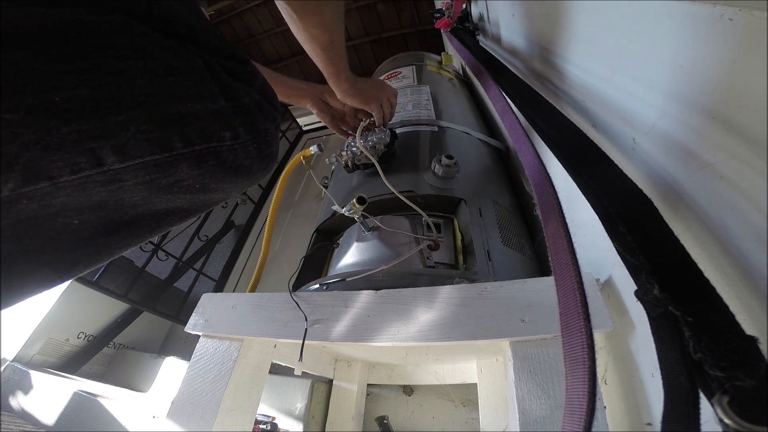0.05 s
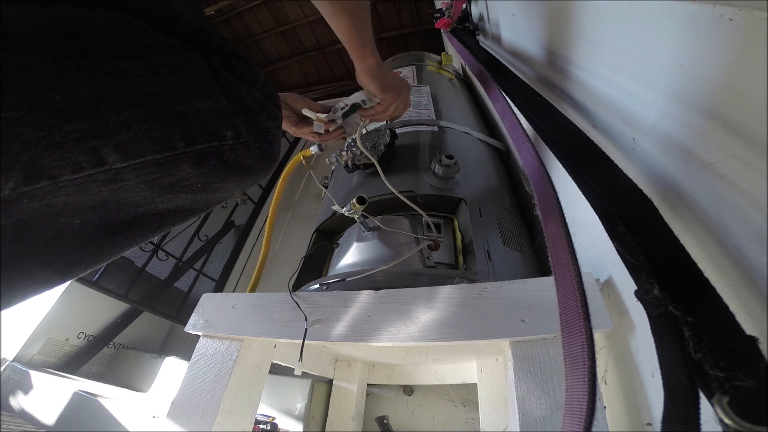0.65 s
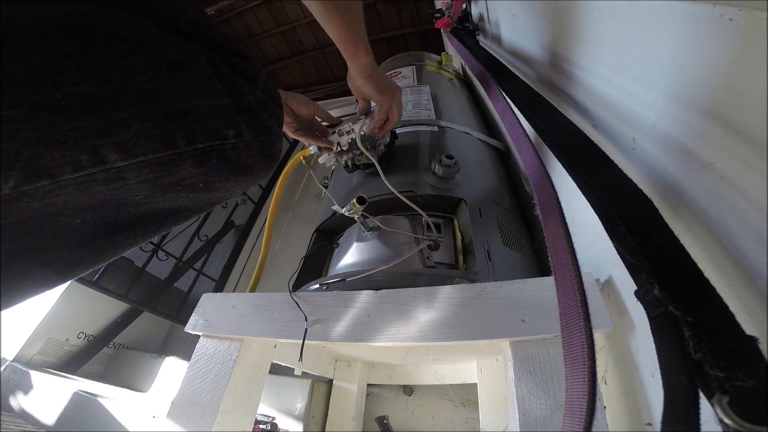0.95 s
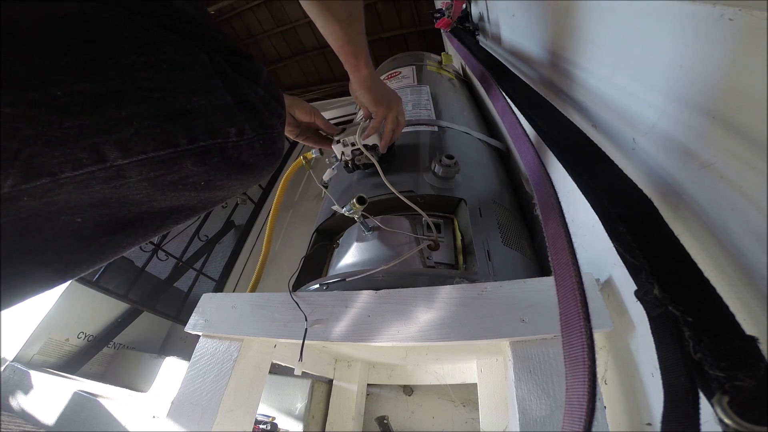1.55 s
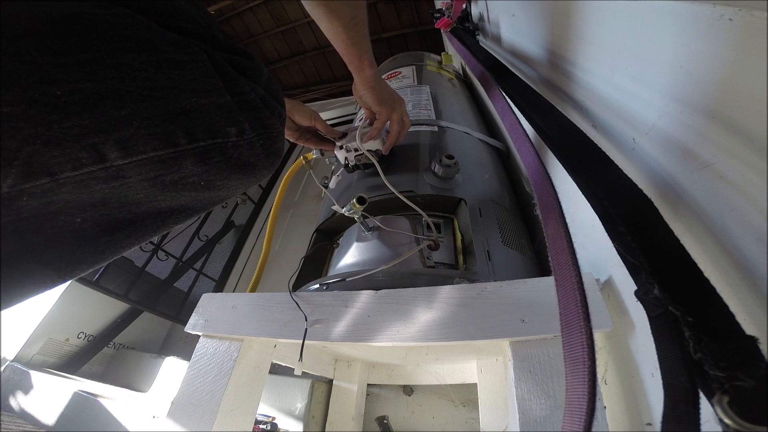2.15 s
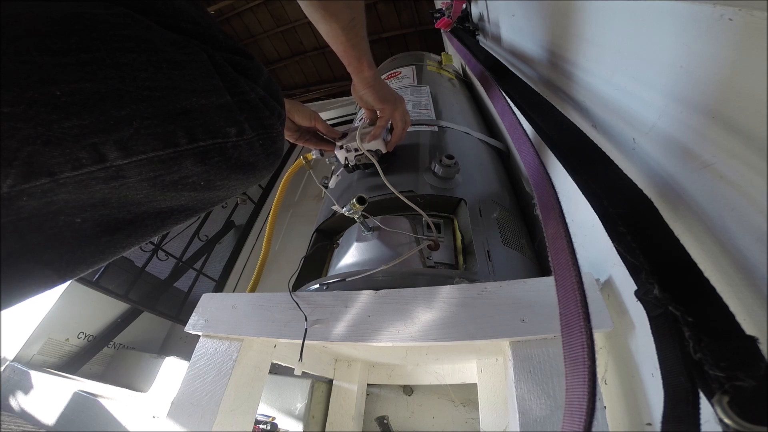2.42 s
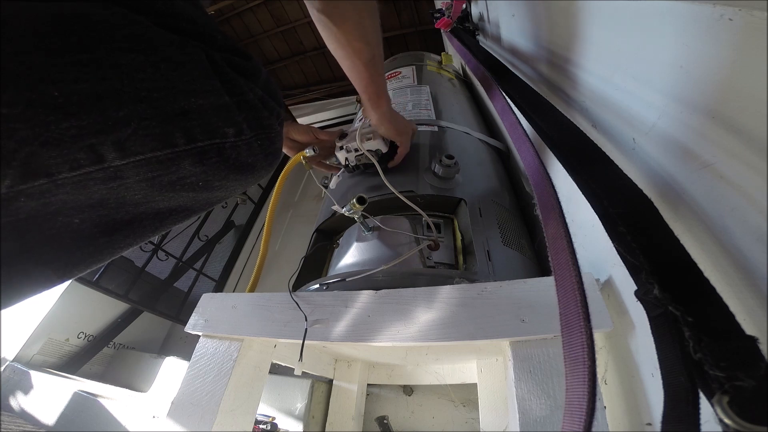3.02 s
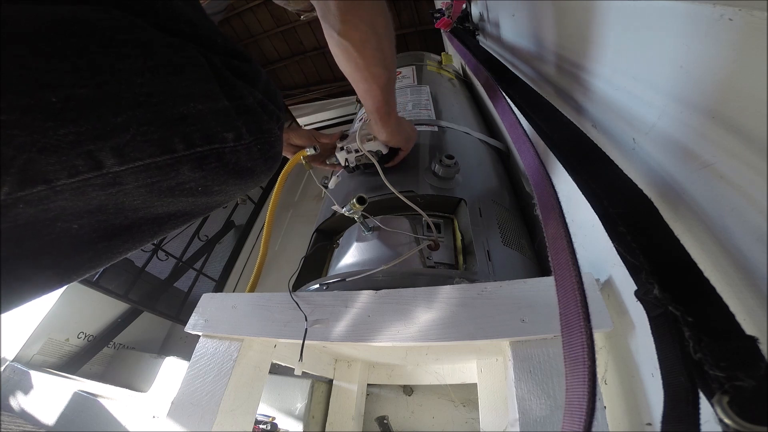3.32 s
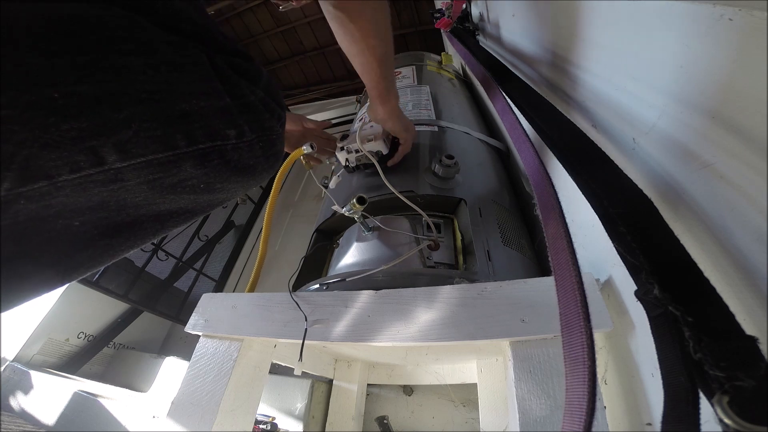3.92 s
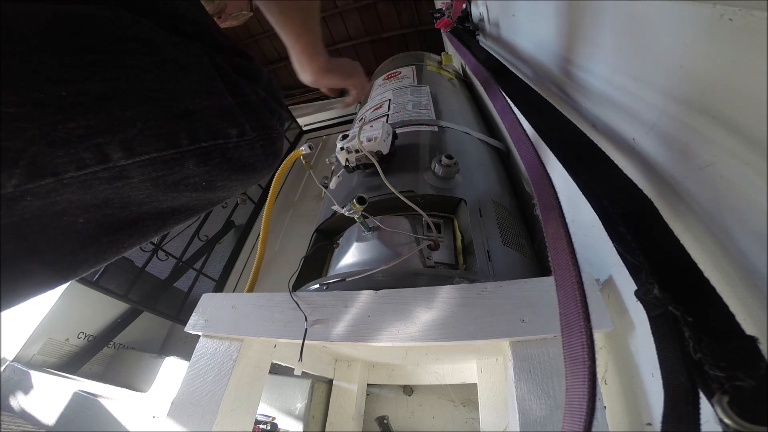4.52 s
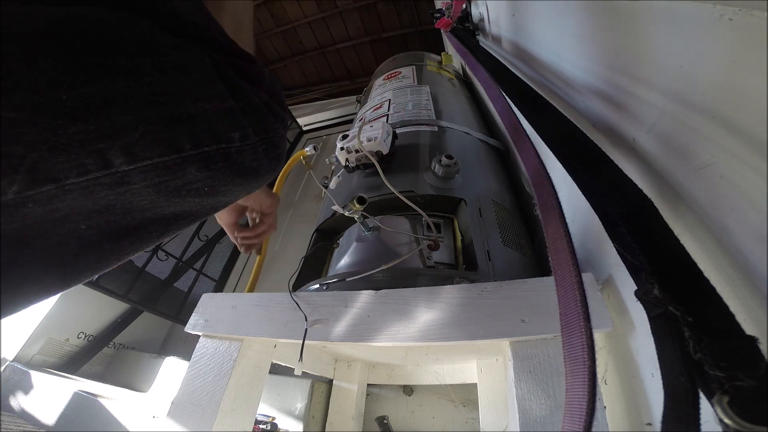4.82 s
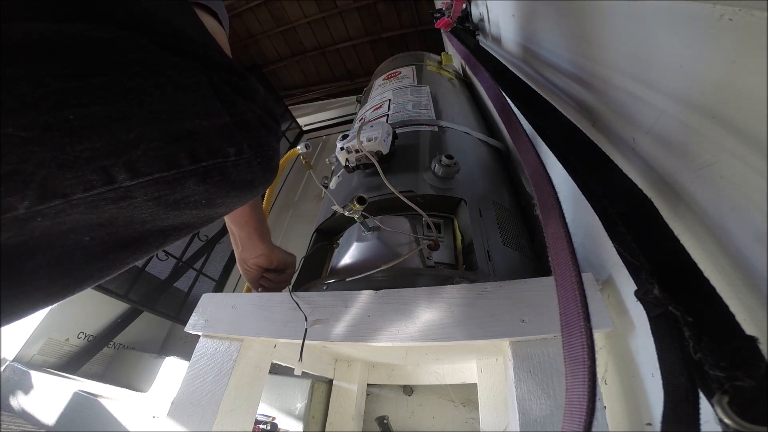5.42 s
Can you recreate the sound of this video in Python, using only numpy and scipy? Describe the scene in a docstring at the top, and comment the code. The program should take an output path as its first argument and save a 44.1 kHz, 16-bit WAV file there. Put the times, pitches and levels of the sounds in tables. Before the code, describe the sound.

Hands work on the wires of a water heater's gas valve in a narrow closet, making soft rustles, fingernail scratches and light ticks. Past the middle, the plastic cover snaps home loudly with a brief hollow ring from the steel tank, and a smaller snap follows. Near the end come a low scuff, a short scrape and a tap. The handling sounds close, over a faint, distant idling engine.

```python
"""The plastic cover of a water heater's gas valve snaps home as hands work on it in a narrow closet.
Each impact excites the valve's damped modes, drives the steel tank and reverberates between the walls.
Wires rustle and tick by friction, nails scratch by stick-slip, and at the end weight shifts and a hand
scrapes. A far engine idles at its firing frequency while other motors drone in and out.
Gain control ducks the background after the loudest snap."""
import sys
import numpy as np
from scipy import signal
from scipy.fft import rfft, irfft
from scipy.io import wavfile
from scipy.ndimage import uniform_filter1d, minimum_filter1d

SR = 44100
rng = np.random.default_rng(int(sys.argv[2]) if len(sys.argv) > 2 else 0)


def dump_mix(stems):
    """Bounce the given channels to the path in sys.argv[1] as a 16-bit WAV at rate SR."""
    frames = np.atleast_2d(stems).T  # one column per channel
    limited = np.clip(frames, -1, 1)  # hard clip at full scale
    pcm = np.round(limited * 32767).astype(np.int16)
    wavfile.write(sys.argv[1], SR, pcm)


N = 249606


def from_db(db):
    """Amplitude ratio of a level in decibels."""
    return 10 ** (np.asarray(db) / 20)


def rms_one(x):
    """Normalisation to unit rms."""
    return x / np.sqrt(np.mean(x ** 2) + 1e-20)


def at_hz(points, hz):
    """Interpolation on a logarithmic frequency axis."""
    return np.interp(np.log(hz + 1), np.log(np.array(points)[:, 0]), np.array(points)[:, 1])


def noise(spectrum, size=N):
    """Spectral shaping of white noise, at unit rms."""
    hz = np.arange(size // 2 + 1) * SR / size
    shaped = rfft(rng.standard_normal(size)) * from_db(at_hz(spectrum, hz)) * (hz > 10)
    return rms_one(irfft(shaped, size))


def drift(corner_hz):
    """Random modulation: low-passed noise at unit rms."""
    hz = np.arange(N // 2 + 1) * SR / N
    return rms_one(irfft(rfft(rng.standard_normal(N)) / (1 + (hz / corner_hz) ** 2), N))


def band(x, low, high):
    """Causal band-pass filtering."""
    return signal.sosfilt(signal.butter(2, [low, high], "band", fs=SR, output="sos"), x)


def ringing(modes, t):
    """Modal superposition: damped sinusoids of alternating sign."""
    hz, db, t60 = np.array(modes).T[:, :, None]
    strength = from_db(db) * (-1) ** np.arange(len(hz))[:, None]
    return np.sum(strength * from_db(-60 * t / t60) * np.sin(2 * np.pi * hz * t), axis=0)


def add(track, start, sound):
    """Superposition of a sound on a track from a start time in seconds."""
    at = int(start * SR)
    track[at:at + len(sound)] += sound[:N - at]


def stroke(start, length, rise_share=0.36):
    """Envelope of one movement: a quarter sine from rest up to 1, and another back."""
    turn = start + length * rise_share
    return np.sin(np.pi / 2 * np.interp(np.arange(N) / SR, [start, turn, start + length], [0, 1, 0]))


# spectrum of the engine's rumble: (frequency [Hz], relative level [dB])
RUMBLE = [(18, -12), (27, 1.5), (37, -3), (60, -1), (85, -3.5), (115, -3), (170, -9), (240, -7),
          (340, -15.5), (450, -16.5), (650, -23.5), (1200, -30), (4000, -56.5)]

def engine(firing_hz=73.4, firing_db=-48, octave_db=-7, rumble_db=-47, swell_s=1.6, swell_db=9.5):
    """Transmission through walls leaves an uneven firing tone, its octave and a low rumble."""
    tone_db = firing_db - swell_db * np.maximum(1 - np.arange(N) / SR / swell_s, 0)
    phase = 2 * np.pi * np.cumsum(firing_hz * (1 + .011 * drift(7))) / SR
    throb_db, octave_throb_db = 3.0 * drift(10), 2.5 * drift(9)
    firing = np.sin(phase) * from_db(throb_db) + np.sin(2 * phase) * from_db(octave_db + octave_throb_db)
    return from_db(tone_db) * rms_one(firing) + from_db(rumble_db) * noise(RUMBLE)


# spectrum of the still air: (frequency [Hz], relative level [dB])
AIR = [(290, -38), (500, -10.5), (871, -6), (1030, -3.5), (2230, -11), (8370, -28), (11400, -33.5),
       (12600, -39), (15000, -34)]

def air(level_db=-61.5):
    """Stationary broadband noise forms the ambient floor."""
    return from_db(level_db) * noise(AIR)


# far motors: (start [s], duration [s], first frequency [Hz], last frequency [Hz], level [dB])
DRONES = [(-.4, 0.96, 111.2, 111.9, -51.5), (2.746, 0.72, 129, 116.6, -53), (3.351, 1.1, 114.7, 109.7, -49),
          (3.998, 1.13, 267, 262.6, -59.5)]

def motor_drones(waver_db=2.5):
    """Amplitude and frequency modulation: each motor's tone swells, glides a little and fades."""
    t, out = np.arange(N) / SR, 0
    for start, length, first_hz, last_hz, level_db in DRONES:
        hz = np.interp(t, [start, start + length], [first_hz, last_hz])
        tone = rms_one(np.sin(2 * np.pi * np.cumsum(hz) / SR))
        out = out + from_db(level_db) * stroke(start, length) * tone
    return out * from_db(waver_db * drift(8))


# friction spectra, middle register and treble: (frequency [Hz], relative level [dB])
RUB_MID = [(300, -20), (1000, -3), (1500, -1), (2000, 0), (2300, 0.5), (2600, -3), (3100, -6), (3700, -2.5),
           (4800, -12.5), (7000, -23), (15000, -53)]
RUB_TREBLE = [(300, -46), (2500, -19), (4500, -0.5), (6500, 3), (8500, -8), (11000, -3.5), (15000, -14)]
# resonances of the slack wires: (frequency [Hz], bandwidth [Hz], gain [dB])
WIRES = [(1610, 180, 1), (2320, 200, 5.5), (3650, 330, -6)]
# hands and sleeves over the wires: (start [s], duration [s], level [dB], relative treble level [dB])
STROKES = [(0, 0.022, -61, -2), (0.244, 0.22, -60, -6), (0.425, 0.21, -60.5, -7), (0.58, 0.31, -60.5, -8.5),
           (0.743, 0.075, -64, -4), (0.795, 0.24, -65, -10), (0.972, 0.16, -58.5, -8.5),
           (1.171, 0.2, -58.5, -10.5), (1.374, 0.12, -60, -15), (1.538, 0.2, -62.5, -10),
           (1.854, 0.33, -59.5, -11.5), (2.71, 0.085, -63.5, -11), (2.843, 0.092, -54, -16),
           (2.933, 0.2, -64.5, -8), (3.12, .09, -59.5, -7), (3.202, 0.12, -61.5, -13),
           (3.98, 0.51, -66.5, -4.5), (4.435, 0.16, -63.5, -1), (4.561, 0.35, -74, 0),
           (5.173, 0.069, -60, -21), (5.3, 0.069, -52.5, -9.5)]

def rubbing(grain_db=2.0, grain_hz=160, catches_per_s=260, buzz_db=-5.0, wander_db=3):
    """Sliding friction: skin and sleeves slip and catch, and under a stroke the wires resonate."""
    restless_mid_db, restless_treble_db = -67.5, -77   # the hands never rest entirely
    mid_power, treble_power = 0, from_db(restless_treble_db) ** 2
    for start, length, level_db, treble_db in STROKES:
        power = (from_db(level_db) * stroke(start, length)) ** 2
        mid_power = mid_power + power
        treble_power = treble_power + power * from_db(treble_db) ** 2
    slips = rms_one(from_db(grain_db * drift(grain_hz)))
    catches = rms_one((rng.random(N) < catches_per_s / SR) * rng.uniform(-1.05, 1, N))
    friction = slips * rng.standard_normal(N) * from_db(-3) + catches
    buzz = sum(from_db(db + wander_db * drift(6.1)) * band(friction, hz - width / 2, hz + width / 2)
               for hz, width, db in WIRES)
    mid = rms_one(slips * noise(RUB_MID) + from_db(buzz_db) * rms_one(buzz))
    restless = from_db(restless_mid_db) * slips * noise(RUB_MID)
    return np.sqrt(mid_power) * mid + restless + np.sqrt(treble_power) * slips * noise(RUB_TREBLE)


def wire_ticks(peak_ticks_per_s=55, tick_db=7, ring_cycles=30):
    """A Poisson process: wires collide at a rate proportional to stroke speed, each at a random pitch."""
    speed = sum(stroke(start, length) for start, length, _, _ in STROKES)
    force = sum(from_db(level_db) * stroke(start, length) for start, length, level_db, _ in STROKES)
    sizes = from_db(tick_db + np.minimum(rng.exponential(1, N), 2))
    flicks = (rng.random(N) < peak_ticks_per_s * speed / SR) * sizes * force
    pitches_hz = np.geomspace(2200, 5400, 10)
    pitch_index = rng.integers(0, len(pitches_hz), N)
    t = np.arange(SR // 50) / SR
    return sum(signal.fftconvolve(flicks * (pitch_index == k), ringing([(hz, 0, ring_cycles / hz)], t))
               for k, hz in enumerate(pitches_hz))[:N]


# spectrum of a contact's crack: (frequency [Hz], relative level [dB])
CRACK = [(150, 1), (600, 0), (1000, -0.5), (2000, 4.5), (3800, 2), (5000, -8), (7000, -8.5), (9000, -15),
         (15000, -14.5)]
# modes of the valve housing and cover: (frequency [Hz], level [dB], decay time T60 [s])
VALVE = [(575, -15.5, 0.037), (744, -7, .03), (1003, -15, .045), (1130, -11.5, .033), (1687, -1.5, .02),
         (1835, -0.5, 0.016), (2170, -3.5, 0.017), (2420, -4.5, .018), (2645, -12.5, .015),
         (3067, -5, 0.027), (3385, -4.5, .028), (3680, -4, .025), (3890, -5, .02), (4130, -9, .02),
         (4470, -11.5, .016), (4850, -13, .016), (5710, -16, 0.012), (6100, -19.5, 0.024),
         (6940, -15, .012), (10620, -23, .012)]

def contact(levels_db, contact_s, spot, valve_db, damping_db_per_s=0, rise_s=0.00096, scatter_db=-12.0):
    """Impact excitation: a crack, its scatter off nearby parts and the modes of valve and struck spot."""
    t = np.arange(SR // 8) / SR
    scatter = from_db(scatter_db - 60 * t / 0.097)
    crack = from_db(0.5) * noise(CRACK, size=len(t)) * (np.exp(-t / contact_s) + scatter)
    modes = from_db(valve_db) * ringing(VALVE, t) + ringing(spot, t)
    hit = (modes + crack) * (1 - np.exp(-t / rise_s)) * from_db(-damping_db_per_s * t)
    # neighbouring bands take opposite signs so that they join without a gap
    thud, body = -band(hit, 130, 1100), band(hit, 1300, 4700)
    edge, sparkle = -band(hit, 4500, 8000), band(hit, 9000, 14000)
    # each band's level is its rms over the first 10 ms
    return sum(from_db(db) * part / np.sqrt(np.mean(part[:SR // 100] ** 2))
               for db, part in zip(levels_db, (body, thud, edge, sparkle)))


# blows on the valve: (time [s], body level [dB], thud level [dB], edge level [dB], sparkle level [dB],
# contact time [s], hollow mode [Hz], bright mode [Hz], valve mode gain [dB], finger damping [dB/s])
SNAPS = [(0.0350, -39.5, -43, -38, -50.5, 0.0031, 1090, 2210, -12, 102),
         (0.0410, -36.5, -46, -60, -66, 0.002, 296, 2290, -16, 92),
         (3.4830, -39, -42, -50, -51, .001, 560, 2500, -8, 3000),
         (3.4854, -24.5, -23.5, -36, -42, .0015, 600, 3850, -8, 1800),
         (3.5042, -5, -15.5, -20.5, -30.5, 0.0019, 598.6, 1760, -1, 240),
         (3.5104, -23, -23, -34, -48, 0.0045, 399, 3100, -9, 20),
         (3.5165, -26.5, -25, -42, -53.5, .004, 301, 1500, -11, 20.5),
         (3.963, -35, -46, -58, -60, 0.0015, 474, 1600, -4, 600),
         (3.966, -21.5, -35.5, -32.5, -41, 0.0011, 580, 3085, 1.5, 400.5),
         (3.9722, -33.5, -44.5, -46, -61, .003, 560, 3250, -10.5, 201),
         (3.9835, -46, -53, -56, -66, .004, 397, 3700, -12, 200)]

def cover_snaps():
    """Damped free vibration: the stiff plastic cover catches, snaps home and rings only briefly."""
    out = np.zeros(N)
    for start, *levels_db, contact_s, hollow_hz, bright_hz, valve_db, damping in SNAPS:
        spot = [(hollow_hz, 0, .022), (bright_hz, 1.5, .016)]
        add(out, start, contact(levels_db, contact_s, spot, valve_db, damping))
    return out


# modes of the sheet steel tank jacket: (frequency [Hz], level [dB], decay time T60 [s])
TANK = [(151.7, 0, 0.28), (200, -2, .2), (248.6, 5, .3), (270, -3, .33), (361, 1, 0.36), (402.4, 5, 0.33),
        (602.6, -21, 0.19), (710, -18.5, .3), (766, -17.5, .22), (955, -10.5, .16), (1206, -19.5, .27)]

def tank(blows, coupling_db=-52):
    """Structure-borne sound: blows on the valve drive the modes of the steel jacket."""
    t = np.arange(SR // 2) / SR
    return from_db(coupling_db) * signal.fftconvolve(blows, ringing(TANK, t))[:N]


# spectrum of the closet's reverberation: (frequency [Hz], relative level [dB])
ECHO = [(100, 1), (260, 14), (420, 12), (600, 0), (1000, 2.5), (1400, 3.5), (1900, -6.5), (2400, -6.5),
        (3500, -4), (4700, -2), (7000, -4.5), (15000, -7)]
# its decay: (frequency [Hz], reverberation time T60 [s])
ECHO_T60 = [(100, 0.99), (400, 0.29), (1500, 0.34), (4000, 0.26), (8000, 0.26), (15000, 0.2)]

def closet(blows, wet_db=-11.5, build_up_s=0.0037):
    """Reverberation: close walls return dense reflections whose treble decays first."""
    t, echo = np.arange(SR // 2) / SR, 0
    edges_hz = np.geomspace(80, 18000, 12)
    for low, high in zip(edges_hz, edges_hz[1:]):
        hz = np.sqrt(low * high)
        decay = from_db(at_hz(ECHO, hz) - 60 * t / at_hz(ECHO_T60, hz))
        echo = echo + band(rng.standard_normal(len(t)), low, high) * decay
    echo = echo * (1 - np.exp(-t / build_up_s))
    return from_db(wet_db) * signal.fftconvolve(blows, echo / np.linalg.norm(echo))[:N]


# fingernails and wire ends drawn over the cover: (start [s], duration [s], level [dB])
SCRATCHES = [(.275, .12, -56.5), (.45, .13, -58), (1.184, 0.14, -58.5), (1.395, 0.11, -62), (1.57, .1, -60),
             (4.452, .115, -62.5)]
# modes that a scratch excites: (frequency [Hz], level [dB], decay time T60 [s])
SCRATCH_MODES = [(1600, -3, .012), (2250, 1, 0.022), (2430, -2, .015), (3680, -2, .022), (4050, -6, .014),
                 (4750, -8, .012), (5550, -9, .012), (7050, -15, .012)]

def scratches(slips_per_s=190, unevenness=0.45, size_spread_db=5.1):
    """Stick-slip motion: every slip of a hard edge excites each mode with a random strength."""
    rate = slips_per_s * np.exp(unevenness * drift(90))
    onsets = np.diff(np.floor(np.cumsum(rate) / SR), prepend=0)
    slips = onsets * from_db(size_spread_db * rng.uniform(-1, 1, N))
    t = np.arange(SR // 20) / SR
    rings = sum(signal.fftconvolve(slips * rng.standard_normal(N), ringing([mode], t))[:N]
                for mode in SCRATCH_MODES)
    return rms_one(rings) * sum(from_db(db) * stroke(start, length) for start, length, db in SCRATCHES)


# modes of the wire terminals: (frequency [Hz], level [dB], decay time T60 [s])
TERMINALS = [(1475, -11, 0.027), (3690, -19, 0.018)]
# light touches of wires and tools, before the band offsets below: (time [s], peak level [dB],
# thud level [dB], edge level [dB], bright mode [Hz], its decay time T60 [s], contact time [s])
TOUCHES = [(.291, -48, -72, -69, 3600, .015, .002), (.315, -43, -68, -61, 3300, 0.018, .005),
           (0.3328, -35, -71, -55, 2480, 0.024, .0043), (.3656, -30.5, -78, -54, 2230, .03, 0.011),
           (0.3766, -37, -70, -62, 3540, .02, .0031), (0.4528, -39, -71, -60, 1740, 0.034, 0.01),
           (.433, -46, -72, -65, 4600, .012, .001), (.533, -43, -68, -66, 1750, .018, .002),
           (0.5746, -43, -68, -61.5, 2360, 0.017, .0028), (.623, -42.5, -71, -80, 2250, 0.068, .001),
           (.8805, -31.5, -56, -71, 2300, 0.022, 0.0027), (.928, -49, -68, -72, 2600, .015, .002),
           (1.2226, -42.5, -64, -62, 2460, .03, .0026), (1.3168, -35, -64, -55.5, 3440, 0.014, 0.002),
           (1.3278, -37, -47, -53, 3700, .025, 0.0018), (1.4027, -43, -59, -67, 4050, 0.025, .006),
           (1.442, -49, -66, -72, 4700, .01, .001), (1.6387, -46, -54, -68, 2270, .025, .004),
           (1.7158, -31, -49.5, -61, 2160, 0.02, .008), (1.7552, -46, -43.5, -70, 720, 0.035, 0.009),
           (1.8958, -37.5, -46, -64, 2490, 0.014, 0.0059), (2.0197, -42, -44, -67, 2033, 0.048, 0.0045),
           (2.626, -42.5, -53.5, -73, 3870, .025, 0.0028), (2.777, -46, -71, -65, 4350, .02, 0.0034),
           (2.872, -42, -50.5, -64, 4500, .025, .006), (2.900, -52, -50, -77, 2390, 0.028, .003),
           (3.1085, -29.5, -52, -65.5, 2330, 0.025, .003), (4.046, -41, -53, -61, 3850, .025, .0015),
           (4.236, -46.5, -64, -68, 2400, 0.02, .003), (4.545, -48, -67, -71, 2250, 0.022, .003),
           (5.306, -39, -46.5, -44.5, 3060, 0.016, 0.005), (5.581, -48.5, -46, -66.5, 1650, 0.015, 0.0058),
           (5.643, -31, -45.5, -54.5, 2190, 0.04, 0.011)]

def wire_touches(hollow_hz=465, hollow_spread=0.025, crest_db=12.5):
    """The point of excitation sets the response: each spot touched has its own pitch and decay."""
    out = np.zeros(N)
    for start, peak_db, thud_db, edge_db, bright_hz, t60, contact_s in TOUCHES:
        knock_hz = hollow_hz * (1 + hollow_spread * rng.standard_normal())
        spot = [(knock_hz, -6, .035), (bright_hz, 4, t60)] + TERMINALS
        levels_db = (peak_db - crest_db, thud_db - 2, edge_db - 1, edge_db - 7.5)
        add(out, start, contact(levels_db, contact_s, spot, valve_db=-13, rise_s=0.0005, scatter_db=-13))
    return out


# a tiny pop close by and a deeper one as the cover gives: (time [s], peak level [dB], width [s])
POPS = [(0.7967, -31, 0.00017), (3.483, -24.5, 0.00068)]

def dull_pops():
    """Gaussian pressure pulses: the wider the push of air, the less treble it holds."""
    t = np.arange(N) / SR
    return -sum(from_db(db) * np.exp(-.5 * ((t - centre) / width) ** 2) for centre, db, width in POPS)


# firm pushes on the valve: (time [s], level [dB])
KNOCKS = [(1.3285, -34), (1.404, -48), (3.508, -21), (3.968, -36.5), (4.015, -38)]
# modes of the valve on its pipe: (frequency [Hz], level [dB], decay time T60 [s])
PIPE = [(402, -8.5, .2), (440.7, -0.5, .24), (483.3, -8.5, .16), (563, -9, .1)]

def hollow_knocks():
    """Impulse response: a push rocks the whole valve on its pipe, which rings on hollowly."""
    out, t = np.zeros(N), np.arange(SR // 3) / SR
    for start, level_db in KNOCKS:
        add(out, start, from_db(level_db) * ringing(PIPE, t))
    return out


# spectra of the scuff and of the floor's rumble: (frequency [Hz], relative level [dB])
SCUFF = [(25, -2), (60, -10), (115, 3), (180, -7), (240, -1), (290, 4), (350, -8), (450, -9.5),
         (800, -17.5), (1600, -25), (3000, -35), (6000, -52), (15000, -59)]
FLOOR_RUMBLE = [(20, 0.5), (35, 6.5), (60, -4.5), (120, 0.5), (220, -16), (1000, -67)]
# shifts of weight as the worker reaches down: (start [s], duration [s], scuff level [dB], floor level [dB])
SHIFTS = [(4.836, 0.6, -48.5, -68), (5.2, 0.16, -45, -52), (5.31, 0.36, -49.5, -48.5),
          (5.548, 0.14, -45.5, -40)]

def shuffle(lump_db=1.5):
    """Friction and forced vibration: shifting weight makes a lumpy scuff and the floor rumbles."""
    scuff = rms_one(noise(SCUFF) * from_db(lump_db * drift(40)))
    floor = noise(FLOOR_RUMBLE)
    return sum(stroke(start, length) * (from_db(scuff_db) * scuff + from_db(floor_db) * floor)
               for start, length, scuff_db, floor_db in SHIFTS)


# spectrum of the short scrape: (frequency [Hz], relative level [dB])
SCRAPE = [(150, -9), (450, 7), (800, 5), (1400, 3.5), (2100, 4), (3000, -2.5), (4000, -8), (6500, -21),
          (9000, -31), (15000, -38)]

def scrape(start_s=5.226, level_db=-38, rise_s=0.0012, decay_s=0.048, grain_db=1.0):
    """Roughness noise: the hand drags briefly over a coarse surface low by the tank."""
    t = np.maximum(np.arange(N) / SR - start_s, 0)
    drag = (1 - np.exp(-t / rise_s)) * np.exp(-t / decay_s)
    return from_db(level_db) * drag * rms_one(noise(SCRAPE) * from_db(grain_db * drift(160)))


def scene():
    """Linear superposition of handwork and background; only the blows excite tank and closet."""
    blows = cover_snaps() + wire_touches() + wire_ticks()
    resonance = tank(blows) + closet(blows) + hollow_knocks()
    friction = scratches() + rubbing() + shuffle() + scrape()
    background = engine() + motor_drones() + air()
    return (blows + resonance + friction + dull_pops() + background)[None]


def record(dry, threshold_db=1, attack_s=0.0052, release_db_per_s=15, cutoff_hz=15600):
    """Automatic gain control ducks after a loud peak; a fast limiter and a steep low-pass follow."""
    recovery_db = release_db_per_s * np.arange(N) / SR
    over_db = np.maximum(20 * np.log10(np.abs(dry[0]) + 1e-9) - threshold_db, 0)
    held_db = np.maximum.accumulate(over_db + recovery_db) - recovery_db
    pole = np.exp(-1 / (attack_s * SR))
    ducked = dry * from_db(-signal.lfilter([1 - pole], [1, -pole], held_db))
    full_scale_gain = 1 / np.maximum(np.abs(ducked), 1)
    limiter_gain = uniform_filter1d(minimum_filter1d(full_scale_gain, size=45), size=45)
    low_pass = signal.ellip(10, .1, 70, cutoff_hz, fs=SR, output="sos")
    return signal.sosfilt(low_pass, ducked * limiter_gain)


dry = scene()
out = record(dry)
dump_mix(out)
```